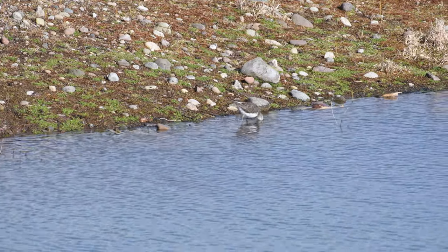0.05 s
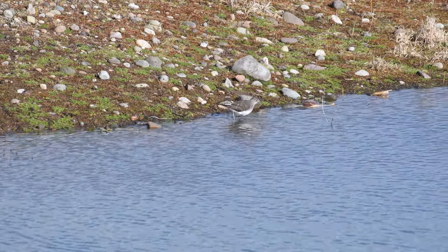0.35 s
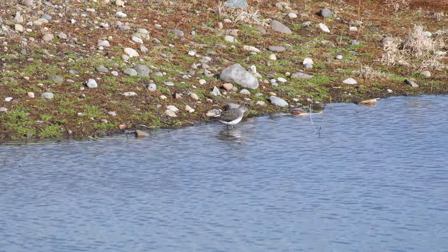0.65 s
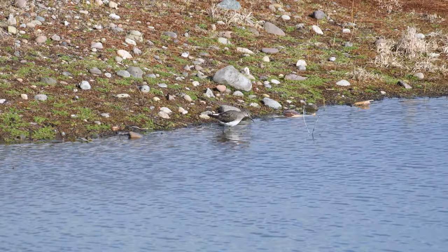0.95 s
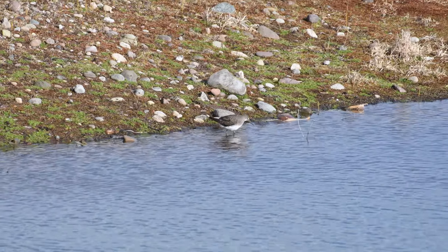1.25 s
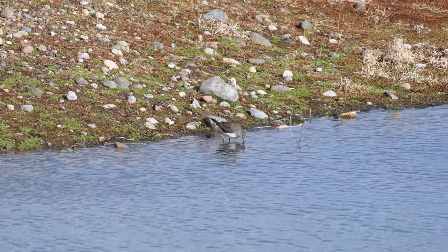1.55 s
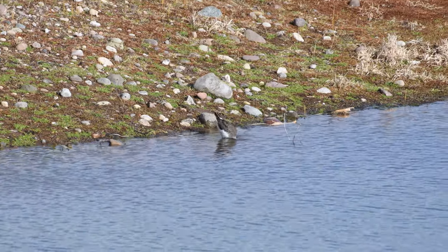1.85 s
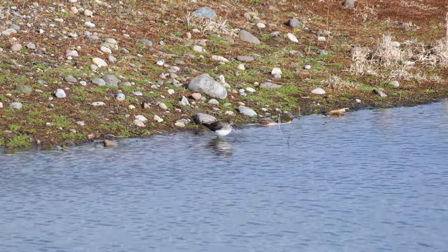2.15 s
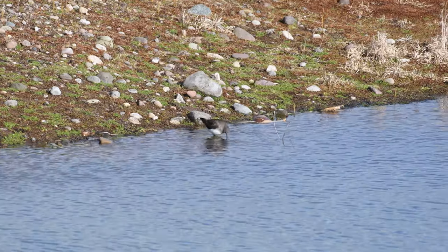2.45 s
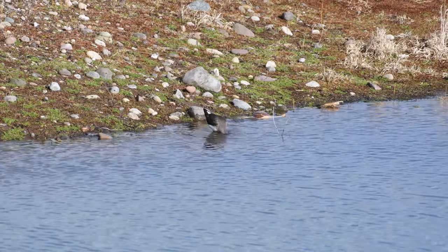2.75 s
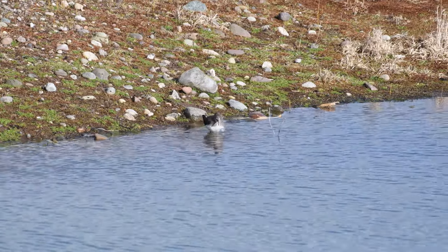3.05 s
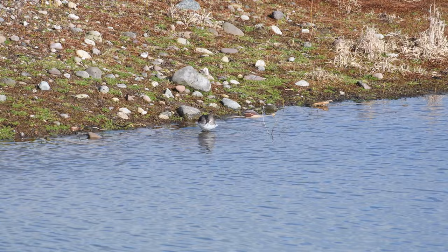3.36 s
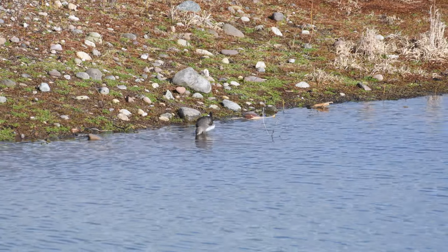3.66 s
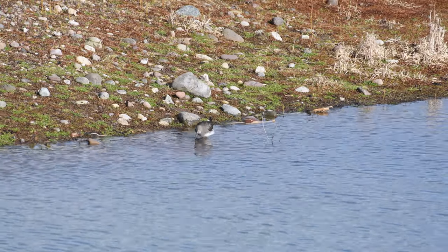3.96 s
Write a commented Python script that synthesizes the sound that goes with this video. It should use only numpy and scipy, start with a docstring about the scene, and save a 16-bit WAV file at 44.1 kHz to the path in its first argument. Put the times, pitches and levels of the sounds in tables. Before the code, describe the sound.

Soft, steady roar of distant traffic at the water's edge, with faint wind and one plink.

```python
"""Far traffic roars softly, swells and recedes, heard from a quiet stream bank. The roar is broadband
noise; in it are a hollow moan, a rumble and a wavering low engine drone. A soft gust passes, a high hiss
rises and falls, and one small drip-like plink, a damped vibration, sounds to the right. A camera's stereo
microphone adds its own steady noise, and the camera cuts two narrow notches into everything."""
import sys
import numpy as np
from scipy import signal
from scipy.fft import rfft, irfft
from scipy.io import wavfile

SR = 44100
rng = np.random.default_rng(int(sys.argv[2]) if len(sys.argv) > 2 else 0)


def wav_record(signal):
    """Record a signal, one row per channel, as 16-bit PCM in the file named by sys.argv[1]."""
    frames = np.transpose(np.atleast_2d(signal))
    bounded = np.clip(frames, -1, 1)
    # unit amplitude maps onto the largest positive 16-bit level
    quanta = np.round(bounded * 32767).astype(np.int16)
    wavfile.write(sys.argv[1], SR, quanta)


N = 176400


def undb(db):
    """Amplitude ratio of a level in decibels."""
    return 10 ** (np.asarray(db) / 20)


def unit(x):
    """Normalisation to rms 1."""
    return x / np.sqrt(np.mean(x ** 2))


def over_time(rows):
    """Linear interpolation of (time_s, value) rows at every sample."""
    return np.interp(np.arange(N) / SR, *np.array(rows).T)


def over_pitch(rows, hz):
    """Interpolation of (frequency_hz, value) rows on a logarithmic frequency axis."""
    f, value = np.array(rows).T
    return np.interp(np.log(hz + 1e-9), np.log(f), value)


def drift(rate_hz):
    """Random fluctuation: noise low-passed at rate_hz; rms 1."""
    f = np.fft.rfftfreq(N, 1 / SR)
    return unit(irfft(rfft(rng.standard_normal(N)) * (f > 0) / (1 + (f / rate_hz) ** 4), N))


def swell(middle_s, half_length_s):
    """Gaussian envelope: 1 at its middle, 1/e^2 a half length to either side."""
    return np.exp(-2 * ((np.arange(N) / SR - middle_s) / half_length_s) ** 2)


def wavering_tone(hz, waver_hz, rate_hz):
    """Random frequency modulation of a sine, with rms deviation waver_hz; rms 1."""
    pitch_hz = hz + waver_hz * drift(rate_hz)
    return unit(np.sin(2 * np.pi * np.cumsum(pitch_hz) / SR))


def resonance(hz, width_hz):
    """Response of a single resonance to random forcing; rms 1."""
    f = np.fft.rfftfreq(N, 1 / SR) + 1e-9
    detune = (f - hz ** 2 / f) / width_hz
    return unit(irfft(rfft(rng.standard_normal(N)) / np.sqrt(1 + detune ** 4), N))


def diffuse_field(spectrum, width, balance, flicker_db, flicker_hz):
    """Partly coherent stereo noise from independent mid and side; each octave flickers alone; rms 1."""
    f = np.fft.rfftfreq(N, 1 / SR)
    spread = undb(over_pitch(width, f))
    mid, side = rfft(rng.standard_normal((2, N)))
    sign = np.array([[1], [-1]])  # left, right
    stereo = (mid + sign * side * spread) / np.hypot(1, spread)
    stereo *= undb(over_pitch(spectrum, f) + sign * over_pitch(balance, f) / 2)
    octave = np.clip(np.log2((f + 1e-9) / 31.25), 0, 9)
    bands = (irfft(stereo * np.maximum(1 - abs(octave - k), 0), N) for k in range(10))
    return unit(sum(band * undb(flicker_db * drift(flicker_hz)) for band in bands))


def microphone_noise():
    """Self-noise: stationary, and uncorrelated between the two channels."""
    # noise spectrum: frequency_hz, relative_density_db
    spectrum = [(200, -27), (6000, 9), (9000, 4.5), (12000, -11.5), (15500, -14)]
    colour = undb(over_pitch(spectrum, np.fft.rfftfreq(N, 1 / SR)))
    return unit(irfft(rfft(rng.standard_normal((2, N))) * colour, N)) * undb(-57.5)


def hiss():
    """Amplitude-modulated high noise, like breeze in dry grass: it swells and trembles slightly."""
    # slow envelope: time_s, level_db
    level = [(0, -52), (.35, -51), (.56, -50), (.75, -51), (.92, -50.5), (1.2, -48), (1.55, -49),
             (1.95, -51), (2.15, -51), (2.4, -52), (2.7, -52.5), (3.05, -51), (3.5, -51.5), (4, -53)]
    # hiss spectrum: frequency_hz, relative_density_db
    spectrum = [(2000, -27), (3200, -6), (4200, -5.5), (5200, -0.9), (6500, 0.5), (7200, -5), (8700, -3.5),
                (10000, -6), (11000, -12), (12500, -16.5), (15500, -30)]
    # stereo width: frequency_hz, side_minus_mid_db
    width = [(3000, 3), (4300, 3.5), (5200, -2.4), (6600, -3.9), (7400, 0.4), (12000, -.8)]
    # stereo balance: frequency_hz, left_minus_right_db
    balance = [(3200, 3.5), (4500, -3), (6200, -1), (7200, -0.5), (8400, -4.5), (9600, -1.5), (10900, 10),
               (12500, 3.5), (15000, 5)]
    rustle = diffuse_field(spectrum, width, balance, flicker_db=0.64, flicker_hz=42)
    tremble_db = 0.44 * drift(rate_hz=16)
    return rustle * undb(over_time(level) + tremble_db)


def gust():
    """Swells of band-limited noise: a breeze, incoherent between channels, and coherent dull buffets."""
    # wind-like buffets: middle_s, half_length_s, level_db, centre_hz
    swells = [(0.564, .035, -45, 105), (0.807, 0.029, -45, 300), (0.882, .03, -46.5, 130),
              (1.15, .12, -52.5, 230), (2.79, .09, -52.5, 530), (3.254, .07, -49.5, 239.8)]
    breeze = np.array([resonance(1030, width_hz=840) for _ in range(2)])
    buffets = sum(resonance(hz, width_hz=160) * swell(middle_s, half_s) * undb(db)
                  for middle_s, half_s, db, hz in swells)
    return breeze * swell(middle_s=0.77, half_length_s=0.23) * undb(-52) + buffets


def plink():
    """Damped free vibration: a faint tick, then two modes ring and decay exponentially, like a drip."""
    start_s, rise_s, pan_right_db = 2.452, 0.0032, 12
    tick_lead_s, tick_decay_s = 0.0033, 0.008
    t = np.arange(N) / SR - start_s
    age = np.maximum(t, 0)
    mode = lambda hz, t60_s: np.sin(2 * np.pi * hz * age) * np.exp(-np.log(1000) * age / t60_s)
    ring = mode(hz=1780, t60_s=0.048) + undb(-3) * mode(hz=2400, t60_s=0.025)
    ring *= 1 - np.exp(-age / rise_s)
    tick_age = np.maximum(t + tick_lead_s, 0)
    tick = resonance(2500, width_hz=2400) * (tick_age > 0) * np.exp(-tick_age / tick_decay_s)
    pan = undb(np.array([[-1], [1]]) * pan_right_db / 2)
    return (ring * undb(-40.5) + tick * undb(-52)) * pan


def vehicle_moan():
    """A far vehicle's hollow moan: a noise-driven resonance with a gliding motor tone in it."""
    # motor tone: time_s, pitch_hz
    pitch = [(0, 318.7), (.8, 320.4), (1.3, 309.6), (1.55, 340), (1.75, 314), (2.1, 320), (2.25, 365),
             (2.5, 330), (3.1, 313.6), (3.45, 322.3), (4, 335)]
    # envelope of the resonance: time_s, level_db
    level = [(0, -59), (.17, -49), (.3, -60), (.55, -50), (.68, -55), (.82, -51), (1.0, -55.5), (1.2, -58),
             (1.4, -52.5), (1.72, -51), (1.85, -56), (2.07, -58), (2.18, -53), (2.42, -61), (2.52, -53),
             (2.63, -56.5), (2.76, -55.5), (2.97, -62), (3.08, -52.5), (3.17, -59), (3.28, -54.5),
             (3.47, -53.5), (3.75, -63.5), (4, -56)]
    motor = wavering_tone(over_time(pitch), waver_hz=20.03, rate_hz=21.75) * undb(-2)
    return (resonance(331, width_hz=121) + motor) * undb(over_time(level))


def engine_drone():
    """A low engine tone, amplitude-modulated into soft puffs over a narrow-band murmur."""
    # puffs of the drone: middle_s, half_length_s, level_db
    puffs = [(.70, .05, -53), (1.247, .06, -54), (1.49, 0.075, -51), (1.598, 0.035, -54),
             (2.21, .04, -53.5), (2.57, 0.047, -54.5), (3.016, 0.042, -51.5), (3.245, 0.046, -51),
             (3.38, .06, -56), (3.47, .04, -56), (3.86, .05, -55)]
    pitch_hz = 95.8
    envelope = sum(swell(middle_s, half_s) * undb(db) for middle_s, half_s, db in puffs)
    tone = wavering_tone(pitch_hz, waver_hz=11, rate_hz=25.8)
    murmur = resonance(pitch_hz, width_hz=36) * undb(-64)
    return tone * envelope + murmur


def traffic():
    """Far traffic as a superposition: a diffuse broadband roar, a moan, a low rumble and a drone."""
    # envelope of the roar: time_s, level_db
    roar_level = [(0, -45.5), (.17, -45), (.35, -44.6), (.6, -43.5), (.82, -44), (1.05, -44.5),
                  (1.45, -45.5), (1.9, -46), (2.2, -46), (2.4, -47), (2.8, -46.5), (3.3, -46), (4, -46.5)]
    # spectrum of the roar: frequency_hz, relative_density_db
    spectrum = [(20, -25), (36, -18), (50, -9), (80, -6), (130, -9.5), (200, -5), (325, -5), (460, -5),
                (600, -5), (780, -8.5), (1020, -7), (1250, -11), (1800, -11), (2200, -14), (3200, -25),
                (5000, -30), (12000, -63)]
    # stereo width: frequency_hz, side_minus_mid_db
    width = [(110, -56), (200, -46), (300, -28), (380, -20), (500, -14.5), (650, -11.5), (830, -5),
             (1000, -6.5), (1180, 0.5), (1500, 0.7), (2000, 5.5), (3500, 3.7), (5000, -10)]
    # stereo balance: frequency_hz, left_minus_right_db
    balance = [(300, -0.5), (650, 0.5), (1000, -1.3), (1600, -2), (2300, -3), (3000, 1.5), (4500, -1)]
    # envelope of the rumble: time_s, level_db
    rumble_level = [(0, -64), (.45, -51), (.7, -54), (1.05, -53), (1.4, -54), (1.7, -60.5), (4, -64.5)]
    roar = diffuse_field(spectrum, width, balance, flicker_db=0.5, flicker_hz=11)
    roar *= undb(over_time(roar_level))
    moan = vehicle_moan()
    rumble = resonance(170, width_hz=210) * undb(over_time(rumble_level))
    return roar + moan + rumble + engine_drone()


def scene():
    """Linear superposition of the sources and the microphone's self-noise, in stereo."""
    return traffic() + gust() + hiss() + microphone_noise() + plink()


def record(dry):
    """Band-stop and low-pass filtering: the camera rejects two narrow bands and the highest treble."""
    # notch filters: centre_hz, skirt_width_hz, core_width_hz
    notches = [(2613, 386, 216), (7700, 1220, 300)]
    cutoff_hz = 15700
    out = dry
    for hz, skirt_hz, core_hz in notches:
        out = signal.lfilter(*signal.iirnotch(hz, hz / skirt_hz, fs=SR), out)
        edges_hz = [hz - core_hz / 2, hz + core_hz / 2]
        out = signal.sosfilt(signal.butter(2, edges_hz, "bandstop", fs=SR, output="sos"), out)
    return signal.sosfilt(signal.ellip(12, .1, 70, cutoff_hz, fs=SR, output="sos"), out)


dry = scene()
out = record(dry)
wav_record(out)
```